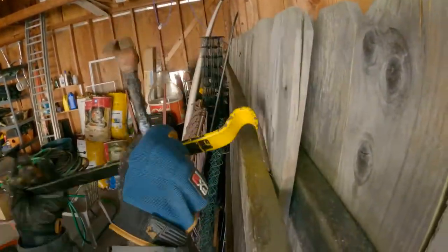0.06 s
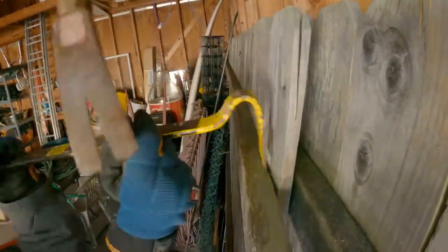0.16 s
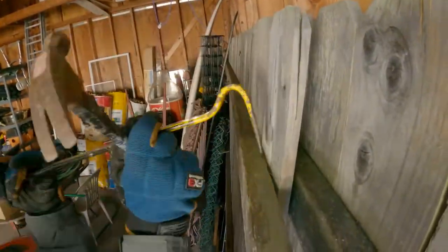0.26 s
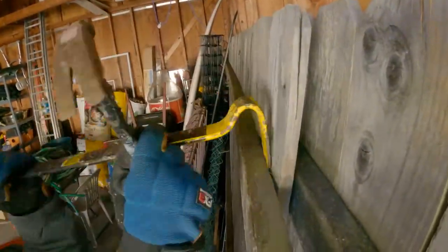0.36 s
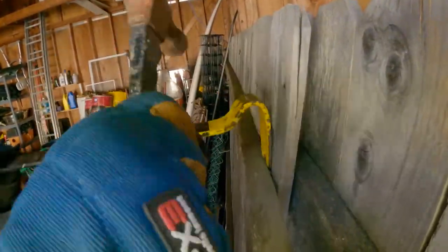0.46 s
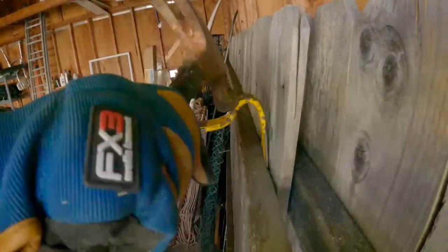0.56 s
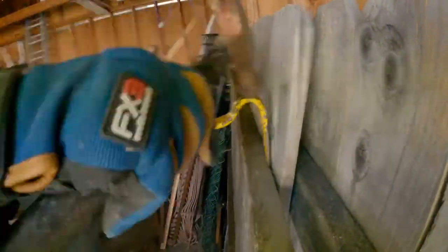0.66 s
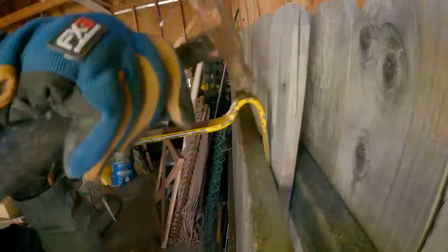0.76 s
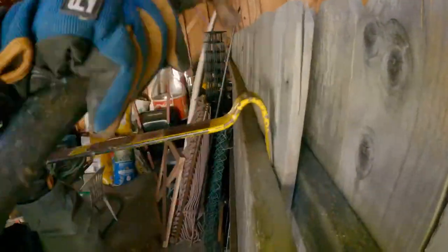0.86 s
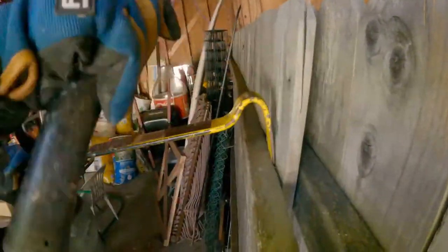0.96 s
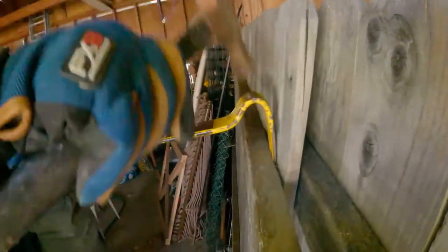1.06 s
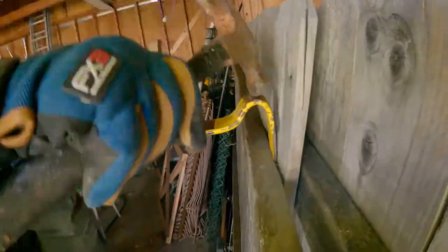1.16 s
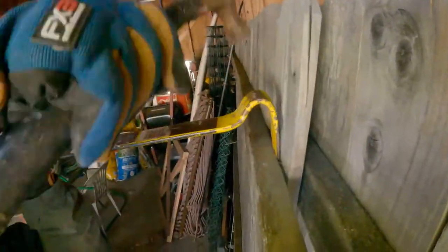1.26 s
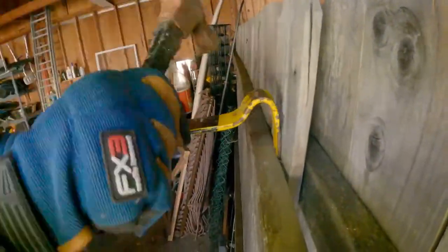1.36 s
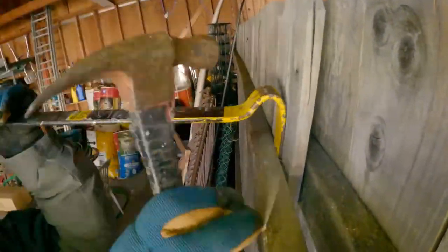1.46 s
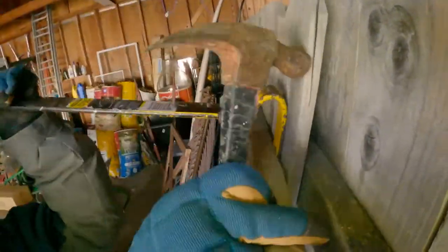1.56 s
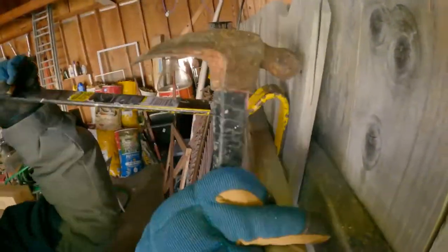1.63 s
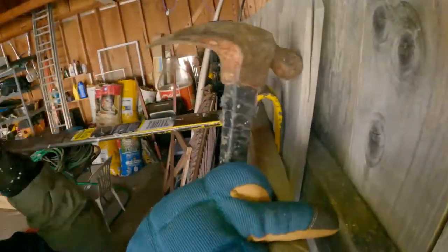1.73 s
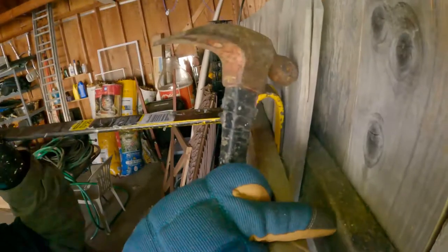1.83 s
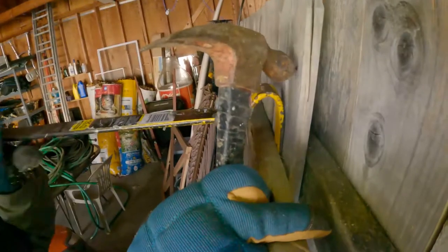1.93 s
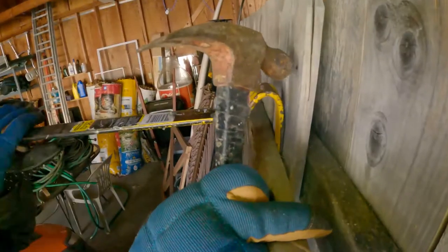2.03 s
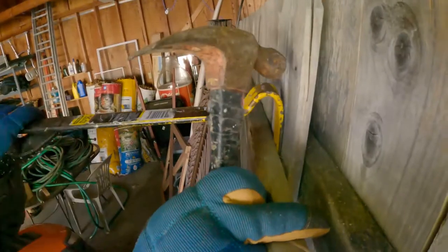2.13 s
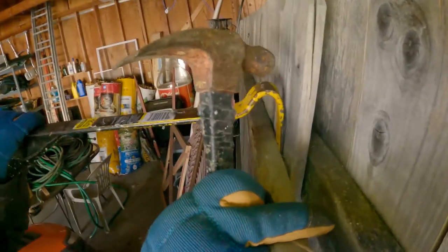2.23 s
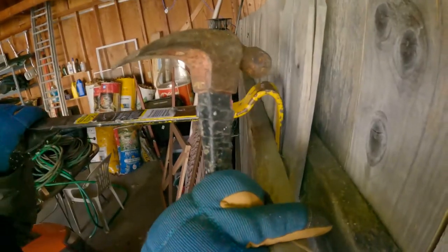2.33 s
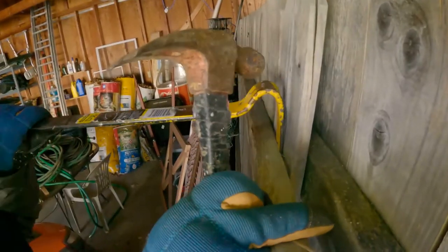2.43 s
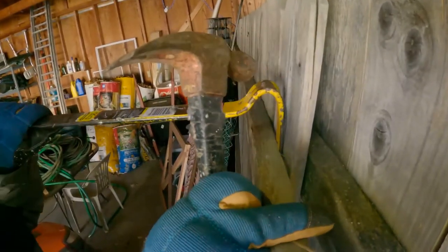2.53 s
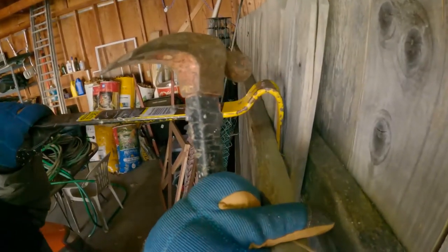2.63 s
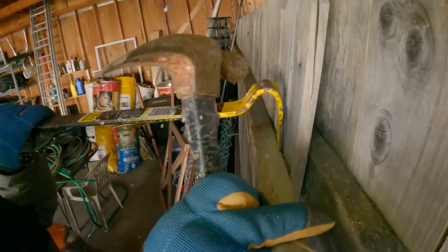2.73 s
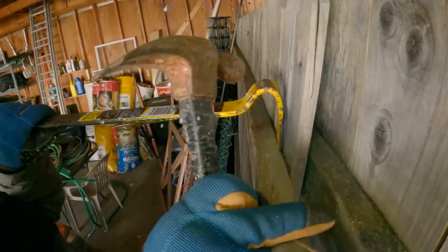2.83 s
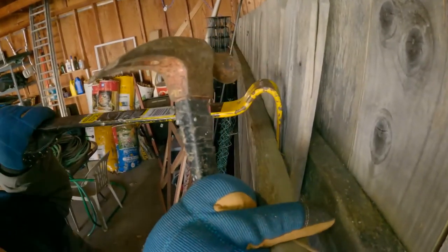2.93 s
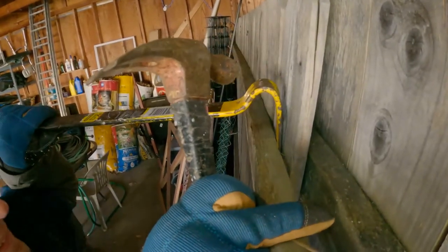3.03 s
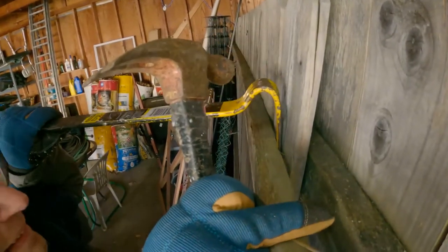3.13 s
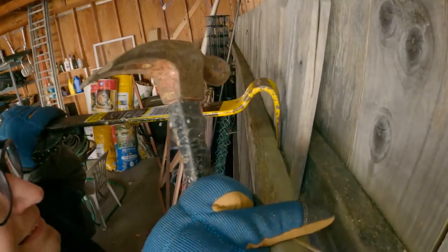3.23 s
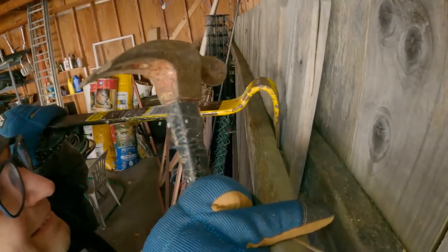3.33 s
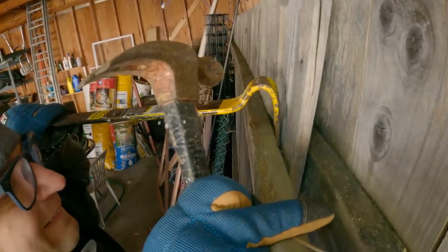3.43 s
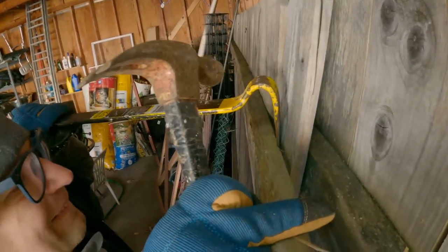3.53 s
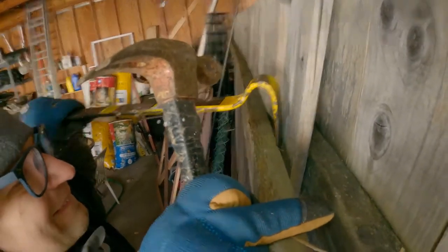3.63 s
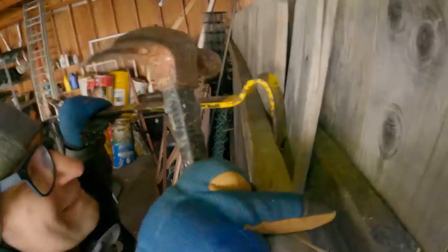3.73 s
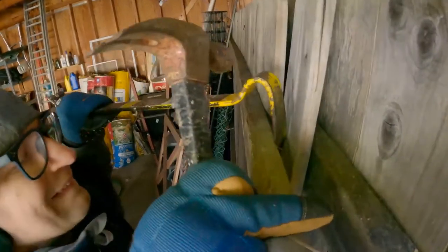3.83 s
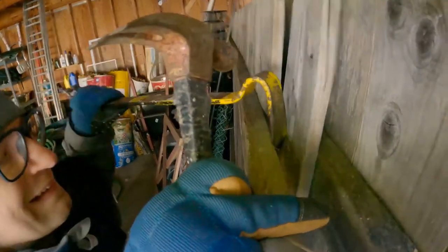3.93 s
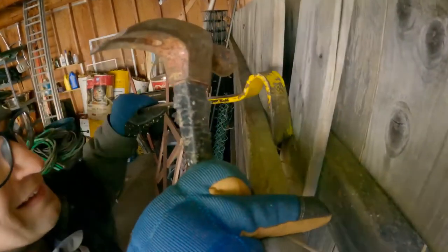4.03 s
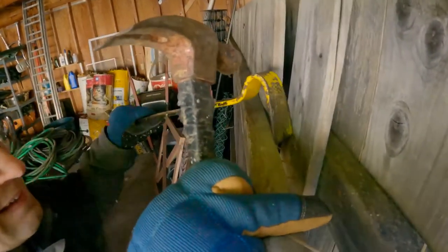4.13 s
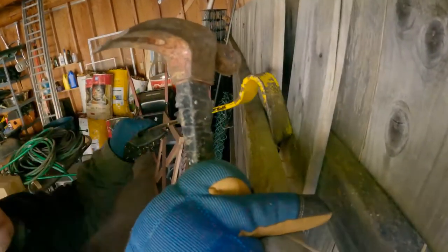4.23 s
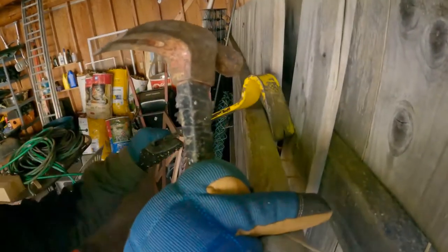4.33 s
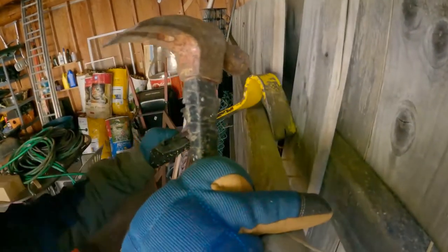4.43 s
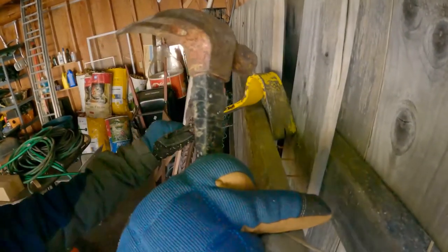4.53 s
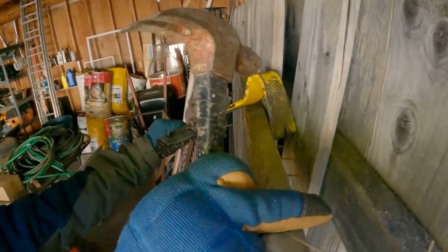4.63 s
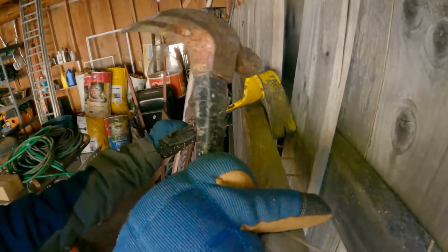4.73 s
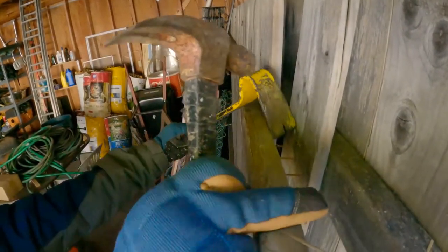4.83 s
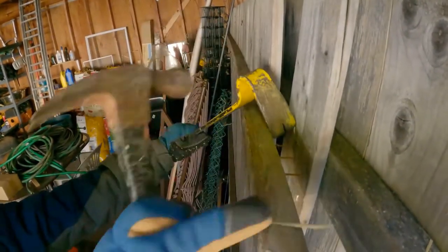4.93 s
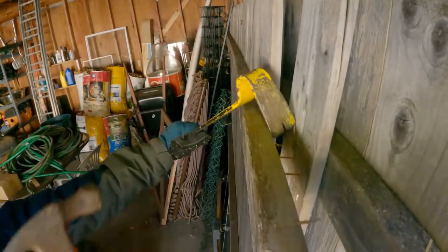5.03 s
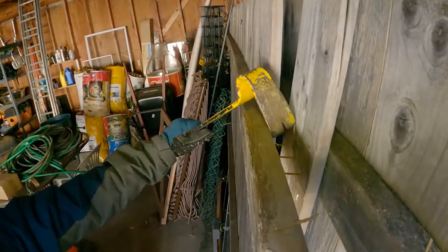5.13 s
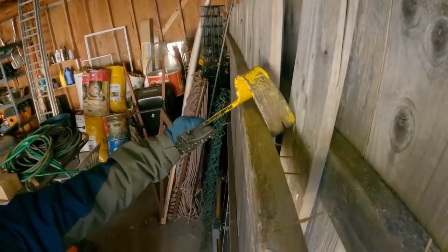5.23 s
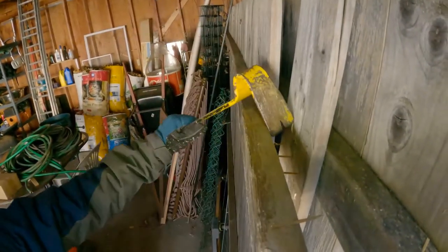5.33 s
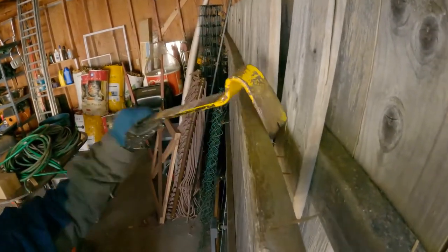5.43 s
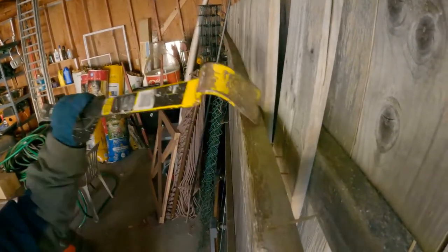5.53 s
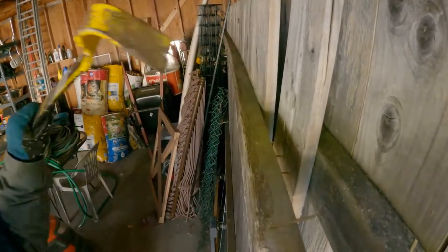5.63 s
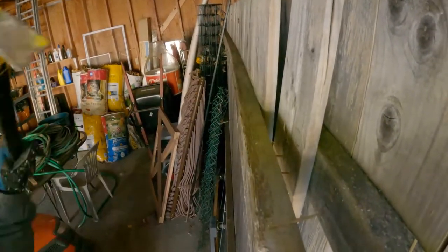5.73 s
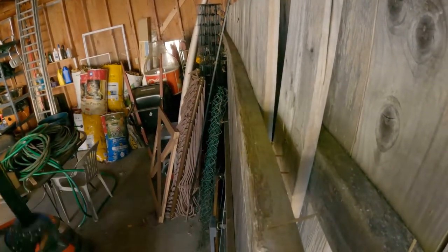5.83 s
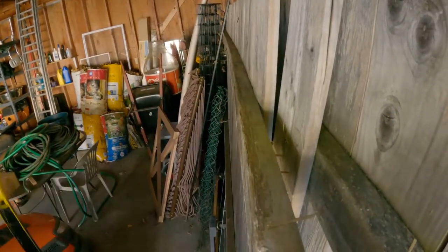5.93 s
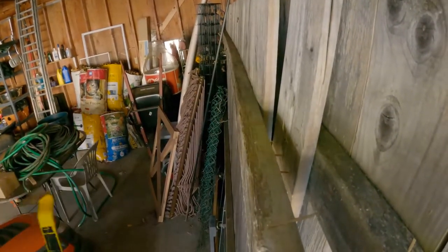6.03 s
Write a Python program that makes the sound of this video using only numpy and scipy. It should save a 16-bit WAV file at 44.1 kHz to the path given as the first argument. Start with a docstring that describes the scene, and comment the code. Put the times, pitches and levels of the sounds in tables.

```python
"""Fence boards prised apart in a shed

Old boards are taken apart close to the microphone, a little to its right, in a wooden shed. For the first
1.8 s time runs about three times as fast: a hammer drives a steel pry bar behind a board in quick taps,
each a burst that rings steel and wood. Then, at normal speed, the bar levers: fibres tick, the nails let go
in loud cracks (struck resonances), the panel shudders (decaying noise and a tone) and the bar is pulled out.
Sleeves swish as streams of tiny catches over an electrical hum of wavering sines and the air of the shed."""
import sys
import numpy as np
from scipy import signal
from scipy.fft import rfft, irfft, next_fast_len
from scipy.io import wavfile
from scipy.ndimage import uniform_filter1d, map_coordinates

SR = 44100
rng = np.random.default_rng(int(sys.argv[2]) if len(sys.argv) > 2 else 0)


def master(y):
    """Save y as 16-bit WAV."""
    cut = np.clip(np.atleast_2d(y).T, -1, 1)
    pcm = np.round(cut * 32767)  # scale
    wavfile.write(sys.argv[1], SR, pcm.astype(np.int16))


N = 268128

FAST_END, SPEED = 1.815, 3.07  # time runs SPEED times as fast until FAST_END [s]

# Levels in all the tables are relative: most layers add a trim of their own.
# single hammer blows: (time [s], steel tick [dB], wood knock [dB], steel clank [dB], knock pitch [ratio])
BLOWS = [(0.175, -35, -37.5, -47, 0.81), (0.212, -45, -39, -51, 0.73), (0.3368, -23, -27, -25.5, 1.03),
         (0.358, -74, -29.5, -59, 1.06), (.379, -36, -30, -30, 1.775), (.597, -36, -23.5, -27, 1.024),
         (0.617, -17.5, -52, -26, 0.59), (1.5869, -29.5, -28.5, -30, 0.894)]
# the bar slips in the gap, with a click and a short scrape:
# (time [s], scrape [dB], click [dB], scrape centre [Hz])
SLIPS = [(1.585, -37.5, -45, 1300), (2.83, -41.5, -47, 1500), (2.9047, -35, -47, 3300),
         (2.911, -43, -37, 1250), (3.209, -52, -43, 1400), (3.235, -49, -41.5, 2600),
         (3.261, -45, -45, 3000), (3.295, -47.5, -33.5, 1500), (3.325, -48.5, -35.5, 2400),
         (3.351, -49, -30, 2800), (3.424, -57, -44, 3100), (3.514, -41.5, -30, 1500),
         (3.552, -42.5, -43, 2800), (3.642, -36, -31, 2600), (3.651, -32.5, -39, 1250),
         (3.735, -35, -43, 1480), (4.9335, -51.5, -29.5, 2800), (5.041, -46, -35, 3000),
         (5.544, -41, -32, 1500), (5.5647, -36, -15.5, 1500)]
# the loosened board rocks and creaks on its nails: (time [s], level [dB])
CREAKS = [(4.208, -37), (4.276, -42.5), (4.297, -39), (4.318, -52), (4.341, -51), (4.362, -45),
          (4.389, -55), (4.407, -44), (4.431, -42), (4.54, -39.5), (4.556, -47), (4.585, -50), (4.621, -44),
          (4.655, -51.5), (4.724, -48.5), (4.741, -49), (4.771, -52), (4.789, -53), (4.868, -55.5),
          (4.938, -52), (4.958, -56), (4.988, -63), (5.626, -48), (5.75, -42.5), (5.824, -41.5),
          (5.838, -55)]


def amp(db):
    """Decibels to gain."""
    return 10 ** (np.asarray(db) / 20)


def unit(x):
    """Scale to rms 1."""
    return x / np.sqrt(np.mean(x ** 2) + 1e-20)


def along(points, hz):
    """Read (frequency [Hz], value) points on a log frequency axis."""
    f, v = np.transpose(points)
    return np.interp(np.log(hz + 1), np.log(f + 1), v)


def curve(rows):
    """(time [s], value) rows as one value per sample."""
    return np.interp(np.arange(N) / SR, *np.transpose(rows))


def wobble(rate):
    """A smooth random curve through rate knots a second."""
    knots = rng.standard_normal(int(N * rate / SR) + 4)
    return map_coordinates(knots, [np.arange(N) * rate / SR])


def filtered(x, response):
    """x times a complex response of frequency."""
    n = x.shape[-1]
    m = 2 * next_fast_len(n // 2 + SR // 16)
    return irfft(rfft(x, m) * response(np.fft.rfftfreq(m, 1 / SR)), m)[..., :n]


def colour(spectrum):
    """Causal (minimum-phase) response with the given (frequency [Hz], level [dB]) outline."""
    def response(hz):
        cepstrum = irfft(np.log(amp(along(spectrum, hz))))
        # folding the cepstrum onto positive times makes the response causal
        return np.exp(rfft(cepstrum * (1 + np.sign(np.fft.fftfreq(len(cepstrum))))))
    return response


def modes(rows):
    """Causal response of damped resonances with alternating sign: (centre [Hz], width [Hz], level [dB])."""
    def response(f):
        total = 0
        for k, (centre, width, db) in enumerate(rows):
            damping = 1j * f * width
            total = total + (-1) ** k * amp(db) * damping / (centre * centre - f * f + damping)
        return total
    return response


def varied(rows, pitch=1):
    """A body's resonances as one contact meets them: each a little stronger or weaker, higher or lower."""
    detune, scatter_db = .012, 1.5
    chance = np.clip(rng.standard_normal((len(rows), 2)), -2, 2)
    return modes([(hz * pitch * (1 + detune * a), width, db + scatter_db * b)
                  for (hz, width, db), (a, b) in zip(rows, chance)])


def add(track, s, x):
    """Mix x into the track from time s."""
    start = max(round(s * SR), 0)
    track[start:start + len(x)] += x[:max(N - start, 0)]


def contact(body, t60, rough, size=6000):
    """A sharp push with a brief rough tail rings a body; it carries the energy of 5 ms at rms 1."""
    t = np.arange(size) / SR
    tail = rng.standard_normal(size) * amp(-60 * t / t60)
    push = rough * tail / np.linalg.norm(tail) + (t == 0)
    x = filtered(push, body)
    return x / np.linalg.norm(x) * np.sqrt(SR / 200)


def grains(rate, spread_db, size):
    """Tiny impacts of uneven size and random sign, rate a second."""
    hit = rng.random(size) < rate / SR
    sign = np.sign(rng.standard_normal(size))
    return unit(hit * sign * amp(spread_db * np.clip(rng.standard_normal(size), -2, 2)))


def wide(pair, side_db):
    """Two unrelated signals as mid and side."""
    return pair[0] + amp(side_db) * np.array([pair[1], -pair[1]])


def swells(rows, rest_db):
    """Gain of movements that grow and fade exponentially over a resting level."""
    t = np.arange(N) / SR
    power = amp(2 * rest_db)
    for s, db, rise, fall in rows:
        power = power + amp(2 * db) * np.exp(-2 * np.maximum((s - t) / rise, (t - s) / fall))
    return np.sqrt(power)


def shed(x, speed=1, count=20):
    """The shed's diffuse answer, new for each of count stretches; faster time shortens its decay."""
    # (frequency [Hz], decay by 60 dB at normal speed [s])
    decay = [(100, 0.94), (500, 0.53), (2000, 0.62), (5000, 0.32), (12000, 0.32)]
    out = np.zeros((2, N + 2 * SR))
    for part in np.array_split(np.arange(N), count):
        if np.abs(x[part]).max() > 0:
            hz, t, z = signal.stft(rng.standard_normal((2, SR * 3 // 4)), SR, nperseg=256)
            swell = 1 - np.exp(-t * speed / 0.0015)
            fade = amp(-60 * t * speed / along(decay, hz / speed)[:, None])
            tail = signal.istft(z * swell * fade, SR, nperseg=256)[1]
            answer = wide(tail / np.linalg.norm(tail[0]), side_db=-22.0)
            wet = signal.fftconvolve(x[part][None], answer, axes=1)
            out[:, part[0]:part[0] + wet.shape[1]] += wet
    return out[:, :N]


def near_boards(x, size=700):
    """Close reflections off the fence differ between the two ports, above the bass."""
    t = np.arange(size) / SR
    echoes = rng.standard_normal(size) * amp(-60 * t / .04) * (t > .002)
    side = signal.fftconvolve(x.mean(axis=0), echoes / np.linalg.norm(echoes))[:N]
    side = filtered(side, lambda hz: hz / (hz + 400))
    return x + amp(-10) * np.array([side, -side])


def background():
    """Wavering sines hum under shaped-noise air; while time runs fast the hum is higher and the air differs."""
    # electrical hum at normal speed: (frequency [Hz], level [dB])
    hum_lines = [(64.6, -58), (156.1, -46), (225, -63)]
    # spectra of the air at normal speed and while time runs fast: (frequency [Hz], level [dB])
    air_shape = [(12, -62), (20, -1), (49, -5), (107, 2), (158, 2.5), (204, -2.5), (310, -12), (499, -18.5),
                 (759, -21.5), (1120, -28), (1440, -53), (4420, -53), (6360, -45), (9140, -46.5),
                 (16000, -61)]
    fast_air_shape = [(15, -44), (25, -26), (85, 1), (150, 1), (249, -6), (489, -7), (911, -17),
                      (1130, -24.5), (1330, -26.5), (1940, -26), (2220, -19.5), (3430, -33.5), (5730, -41),
                      (16000, -61)]
    # the background sinks after the taps and cracks and creeps back: (time [s], level [dB])
    lull = [(1.4, 11), (1.52, 4.5), (1.85, 3), (3.7, 4.5), (4.2, -1), (4.7, 2), (5.3, 2), (5.8, 3.5)]
    fast_hum_db, air_db, fast_air_db = -15.5, -49, -57
    fast = uniform_filter1d((np.arange(N) / SR < FAST_END) * 1., size=400)
    clock = np.cumsum(1 + (SPEED - 1) * fast) / SR
    hum = np.zeros(N)
    for hz, db in hum_lines:
        level = amp(db + 1.8 * wobble(9))
        hum += level * np.sin(2 * np.pi * hz * clock + .6 * wobble(9))
    air, fast_air = (unit(wide(filtered(rng.standard_normal((2, N)), colour(shape)), side_db=-16.0))
                     for shape in (air_shape, fast_air_shape))
    hum = np.sqrt(2) * hum * amp(fast_hum_db * fast)
    still = amp(air_db) * (1 - fast) * air + amp(fast_air_db) * fast * fast_air
    return amp(curve(lull)) * (hum + still)


def friction(spectrum, rate):
    """Sliding contact: a stream of tiny catches."""
    pair = np.array([grains(rate, spread_db=3, size=N) for port in range(2)])
    return unit(wide(filtered(pair, colour(spectrum)), side_db=-9.5))


def handling():
    """Catches in cloth swish, the bar sticks and slips along the wood, low noise rumbles in the worn microphone."""
    # movements: (peak time [s], level [dB], rise time constant [s], fall time constant [s])
    swishes = [(0.05, -52, 0.19, 0.14), (.56, -46.5, 0.045, 0.024), (1.38, -43, 0.41, 0.066),
               (1.83, -44, 0.033, 0.0076), (2.22, -55, 0.64, 0.059), (2.5, -52.5, 0.057, 0.11),
               (3.68, -50.5, 0.52, 0.17), (5.24, -46.5, 0.12, 0.35), (6.05, -36.5, 0.056, 0.027)]  # arm movements swish the sleeves
    strokes = [(1.87, -54.5, 0.08, 0.16), (3.55, -58.5, 0.16, 0.085), (3.82, -32.5, 0.075, 0.2),
               (4.92, -52, 0.11, 0.052), (5.55, -48.5, 0.49, 0.1), (6.04, -56, 1, 0.039)]  # strokes of the bar along the wood
    jolts = [(.37, -17, .25, 0.065), (1.95, -41, 0.066, 0.21), (2.86, -30.5, 0.031, 0.041),
             (3.79, -26.5, .04, 0.46), (5.64, -25, 0.03, 0.17)]  # jolts of the body rumble in the microphone
    # spectra of sleeve cloth, bar on wood and rumble: (frequency [Hz], level [dB])
    cloth_shape = [(300, -49.5), (900, -8), (1400, 5.5), (2000, 5), (3000, 0), (6000, 2), (9500, 0.5),
                   (11000, -7.5), (16000, -17)]
    rub_shape = [(200, -22.5), (420, 4.5), (520, -13.5), (680, 1.5), (1000, 0.5), (1230, -4.5),
                 (1400, -1.5), (1720, -5), (2400, -8.5), (4000, -11.5), (12000, -39)]
    rumble_shape = [(12, -17), (28, 15.5), (60, 13), (110, 2.5), (300, -51.5)]
    # resonances of the rubbed board: (centre [Hz], width [Hz], level [dB])
    groan_modes = [(590, 220, 2.5), (1216, 28, 4), (1400, 170, -14.5), (1750, 110, -9.5), (1700, 130, -12)]
    late = np.arange(N) / SR > FAST_END

    cloth = amp(0.43) * friction(cloth_shape, rate=8200)
    fast_cloth = amp(-3.5) * friction([(hz * SPEED, db) for hz, db in cloth_shape], rate=9500)
    sleeves = swells(swishes, rest_db=-66) * np.where(late, cloth, fast_cloth)

    # the bar sticks and slips unevenly, and each slip rings the board
    slips = unit(amp(3.5 * wobble(45)))
    groan = unit(filtered(slips * grains(rate=600, spread_db=2, size=N), modes(groan_modes)))
    rub = slips * friction(rub_shape, rate=2400)
    drag = swells(strokes, rest_db=-71.5) * unit(groan + amp(5.5) * rub)

    low, fast_low = (
        unit(wide(filtered(rng.standard_normal((2, N)),
                           colour([(hz * speed, db) for hz, db in rumble_shape])), side_db=-14.0))
        for speed in (1, SPEED))
    rumble = swells(jolts, rest_db=-46) * np.where(late, amp(-2.0) * low, amp(-17) * fast_low)
    return sleeves + late * drag + rumble


def scuffing():
    """Bar, board or glove skids a little: a quick swell of tiny catches through a resonance."""
    # the glove shifts its grip: (time [s], level [dB], centre [Hz], time to peak [s])
    grips = [(.548, -43, 3420, 0.0099), (1.94, -53, 2240, 0.033), (2.151, -53.5, 3600, 0.057),
             (2.343, -46, 1800, 0.037), (2.591, -52, 460, 0.019), (5.191, -50, 9800, 0.061)]
    # resonances of the creaking board: (centre [Hz], width [Hz], level [dB])
    creak_modes = [(650, 96, 2.5), (1230, 56, 7.5), (1480, 250, -3.5), (1714, 220, 3), (2600, 870, -15)]
    slip_width, grip_width = 0.56, 0.77  # bandwidth over centre frequency
    slip_rise, creak_rise = 0.007, 0.0077  # time to peak [s]
    out, t = np.zeros(N), np.arange(SR // 2) / SR
    # each single blow skids the bar under its clank
    skids = [(s, clank_db - 16, 1400) for s, tick_db, knock_db, clank_db, pitch in BLOWS]
    skids += [(s, db, hz) for s, db, click_db, hz in SLIPS]
    scuffs = [(s, db, [(hz, hz * slip_width, 0)], slip_rise) for s, db, hz in skids]
    scuffs += [(s, db, creak_modes, creak_rise) for s, db in CREAKS]
    scuffs += [(s, db, [(hz, hz * grip_width, 0)], rise) for s, db, hz, rise in grips]
    for s, db, body, rise in scuffs:
        catches = grains(rate=1500, spread_db=4, size=len(t))
        pressure = (t / rise * np.exp(1 - t / rise)) ** 2
        skid = filtered(pressure * catches, varied(body))
        add(out, s, amp(db) * skid * np.linalg.norm(pressure) / np.linalg.norm(skid))
    return out + amp(-7.5) * shed(out)


def thuds():
    """A bump swings the low modes of the fence; the softer it is, the fewer it reaches."""
    # soft bumps against the fence: (time [s], level [dB], softness cut-off [Hz])
    bumps = [(0.224, -2, 50), (2.006, -22, 168), (3.689, -19, 246), (3.749, -42, 500), (3.789, -24, 253),
             (4.041, -5, 198), (4.239, -5.5, 81.9), (4.389, -9, 69), (5.011, -21.5, 100), (5.605, 1.5, 58),
             (5.612, -22.5, 500), (5.636, -23, 700), (5.755, -18, 80), (5.825, -17.5, 72.5)]
    # low modes of the fence at normal speed: (frequency [Hz], level [dB], decay by 60 dB [s])
    fence = [(63.3, -4.5, 0.17), (89.4, -11, 0.099), (107, -0.5, 0.083), (164.4, -12.5, 0.16),
             (246, -5.5, 0.052), (416.3, -8.5, 0.16)]
    # resonances of the knock as the bar seats itself: (centre [Hz], width [Hz], level [dB])
    seat_modes = [(96.5, 91, 6.5), (335, 490, -2.5), (700, 130, -4)]
    rise_cycles = 1  # each mode builds up over about this many of its cycles
    out = np.zeros(N)
    for s, db, soft_hz in bumps:
        t = np.arange(SR // 2) / SR * (SPEED if s < FAST_END else 1)
        for hz, mode_db, t60 in fence:
            rise = 1 - np.exp(-(t * hz / rise_cycles) ** 2)
            level = amp(db + mode_db - 60 * t / t60) / (1 + (hz / soft_hz) ** 4)
            add(out, s, level * rise * np.sin(2 * np.pi * hz * t))
    # the bar seats itself with one dead knock
    add(out, 2.8335, amp(-22.5) * contact(modes(seat_modes), t60=.01, rough=.1))
    return out + amp(-10) * shed(out)


def squeaking():
    """Stick and slip locks into a wavering tone that swells, glides and stops."""
    # nails squeak and the bent board groans:
    # (time [s], length [s], level [dB], start [Hz], end [Hz], pitch unsteadiness [share])
    squeaks = [(1.865, .06, -47, 1230, 1190, .014), (1.878, .06, -25, 150, 85, .014),
               (3.652, .06, -26, 160, 100, .014), (4.85, .18, -55, 1700, 1640, .04),
               (4.92, .08, -53, 1225, 1270, .035), (5.47, .13, -43, 1360, 1450, .036)]
    flutter_db = 4
    out = np.zeros(N)
    for s, length, db, start_hz, end_hz, unsteady in squeaks:
        u = np.linspace(0, 1, int(length * SR))
        waver, flutter = wobble(300)[:len(u)], wobble(220)[:len(u)]
        hz = (start_hz + (end_hz - start_hz) * u) * (1 + unsteady * waver)
        swell = amp(db + flutter_db * flutter) * np.sin(np.pi * u)
        add(out, s, swell * np.sin(2 * np.pi * np.cumsum(hz) / SR))
    return out + amp(-12) * shed(out)


def shudder():
    """The freed panel booms, noise and one main mode, until friction stops it; loose boards rattle and clap."""
    # the panel springs free and shudders: (time [s], boom [dB], rattle [dB], boom decay by 60 dB [s],
    # rattle decay by 60 dB [s], main mode [dB], main mode at normal speed [Hz])
    shudders = [(1.587, -28.5, -34, 0.19, 0.11, -35.5, 92.2), (3.748, -18, -33, 0.72, 1, -21, 167.7),
                (4.034, -22.5, -25.5, 0.63, 0.37, -24.5, 108.3),
                (5.575, -29.5, -27.5, 0.48, 0.082, -49, 52)]
    # spectra at normal speed: (frequency [Hz], level [dB])
    boom_shape = [(15, -31.5), (28, -4), (45, -3.5), (100, -0.5), (165, 0), (240, -5), (340, -13.5),
                  (480, -13.5), (900, -39), (3000, -109)]
    rattle_shape = [(150, -10.5), (330, 2), (450, -9), (520, -4.5), (620, 4.5), (1000, 9), (1300, -41),
                    (1650, -31), (2200, -4.5), (3500, -15), (7000, -21), (10000, -28), (16000, -46)]
    # resonances of the loose boards, and of a clap: (centre [Hz], width [Hz], level [dB])
    panel_modes = [(324, 13, 13), (426, 17, 0), (612, 24, 7), (850, 32, -4), (997, 16, 3), (1248, 32, 6.5),
                   (1320, 25, -8), (1620, 35, 0.5), (1770, 90, -6), (1960, 18, 2)]
    clap_modes = [(276, 72, 3), (425, 80, -2.5), (606, 23, -4), (1160, 82, -11), (1720, 170, -10.5)]
    # loose boards clap against the rail: (time [s], level [dB], pitch [ratio])
    claps = [(3.747, -17.5, 0.9), (3.762, -27, 1.03), (3.786, -22, 0.96), (3.811, -25, 1.03),
             (3.833, -27, 0.94), (3.864, -42, 1.05), (3.892, -29, 1.05), (3.935, -30.5, 1.2),
             (4.036, -18, 0.91), (4.061, -26.5, 0.82), (4.088, -28, 0.93), (4.126, -27.5, 1.104),
             (4.162, -45, 1.32), (4.21, -39, 1.24)]
    ring_waver = .035  # share of the main mode's pitch
    boom, rattle, t = np.zeros(N), np.zeros(N), np.arange(SR) / SR
    for s, boom_db, rattle_db, boom_t60, rattle_t60, ring_db, ring_hz in shudders:
        speed = SPEED if s < FAST_END else 1
        sway = unit(filtered(rng.standard_normal(SR), lambda f: colour(boom_shape)(f / speed)))
        hz = ring_hz * speed * (1 + ring_waver * wobble(40)[:SR])
        ring = unit(np.sin(2 * np.pi * np.cumsum(hz) / SR))
        envelope = amp(-60 * (t / boom_t60) ** 1.6) * (1 - np.exp(-t / .01))
        add(boom, s, envelope * (amp(boom_db) * sway + amp(ring_db) * ring))
        knocks = grains(rate=200 * speed, spread_db=5, size=SR)
        dull, ringing = (unit(filtered(knocks, lambda f: body(f / speed)))
                         for body in (colour(rattle_shape), modes(panel_modes)))
        add(rattle, s, amp(rattle_db - 60 * t / rattle_t60) * unit(dull + amp(2) * ringing))
    for s, db, pitch in claps:
        add(rattle, s, amp(db) * contact(varied(clap_modes, pitch), t60=0.014, rough=.5))
    return boom + rattle + amp(-14.5) * shed(boom) + amp(-5.5) * shed(rattle)


def strain(count=24):
    """Faint fibre ticks at uneven times, tending louder as the load grows: (time [s], level [dB])."""
    start, end = 3.2, 3.68  # [s]
    first_db, db_per_s, scatter_db = -37, 14, -4
    times = start + (end - start) * (np.arange(count) + rng.random(count)) / count
    return [(s, first_db + db_per_s * (s - start) + scatter_db * rng.standard_normal()) for s in times]


def cracking():
    """Fibres snap, nails jerk and the bar slips: each is a struck snap and splinter hiss that rings the board."""
    # wood fibres snap under the bar: (time [s], level [dB])
    fibres = [(2.5396, -21.5), (2.86, -37), (2.908, -19.5), (3.0077, -28), (3.037, -27), (3.1044, -30.5),
              (3.261, -22), (3.4243, -13.5), (3.43, -18), (3.502, -40), (3.5166, -18), (3.552, -23),
              (3.644, -23), (3.687, -3.5), (3.6931, -6)]
    # the nails let go in jerks: (time [s], snap [dB], board [dB])
    nails = [(3.746, 0.5, -7), (3.7659, -9.5, -29), (3.778, -15.5, -19), (3.806, -14.5, -22),
             (3.9753, -17.5, -19), (4.033, -13, -13.5), (4.0433, -6.5, -14), (4.0487, -10, -16.5),
             (4.058, -13.5, -30)]
    # resonances of snap and board: (centre [Hz], width [Hz], level [dB])
    snap_modes = [(2600, 170, -4.5), (3060, 69, 6), (3360, 690, -5.5), (4790, 560, -4), (5926, 360, 2.5),
                  (6920, 990, 0.5), (8330, 1300, -7), (10500, 700, -13)]
    board_modes = [(910, 710, -14.5), (1373, 122, 7), (1640, 140, -3.5), (1914, 76, -5.5)]
    # spectrum of the splinter hiss: (frequency [Hz], level [dB])
    splinter_shape = [(4000, -55), (8000, 3.5), (10000, -3), (13000, -8), (16000, -11.5)]
    snaps, board = np.zeros((2, N))
    # (time, snap, board, splinter), board and splinter mostly set relative to the snap
    cracks = [(s, db, db - 20, db - 14) for s, db in fibres + strain()]
    cracks += [(s, db, board_db, db - 20.5) for s, db, board_db in nails]
    clicks = [(s, db) for s, scrape_db, db, hz in SLIPS]
    clicks += [(s, db - 3.5) for s, db in CREAKS]
    cracks += [(s, db, db - 18, db - 14) for s, db in clicks]
    for s, snap_db, board_db, splinter_db in cracks:
        snap = contact(varied(snap_modes), t60=.016, rough=1)
        ring = contact(varied(board_modes), t60=.014, rough=.6)
        splinter = contact(colour(splinter_shape), t60=0.013, rough=4.3)
        add(snaps, s, amp(snap_db - 15.0) * snap)
        add(snaps, s, amp(splinter_db - 4.5) * splinter)
        add(board, s, amp(board_db - 8.0) * ring)
    return snaps + board + amp(-17.5) * shed(snaps) + amp(-10.5) * shed(board)


def knock(pitch):
    """A clean blow, cushioned by the wood, rings the wedged board much the same way each time."""
    # resonances of the wedged board: (centre [Hz], width [Hz], level [dB])
    knock_modes = [(120, 90, -9), (215, 80, -9), (390, 56, 7), (460, 50, -5), (625, 130, -2.5),
                   (835, 100, -6), (1110, 150, -15), (1350, 200, -12)]
    soft_hz = 850
    board = modes([(hz * pitch, width, db) for hz, width, db in knock_modes])
    return contact(lambda f: board(f) / (1 + 1j * f / soft_hz) ** 2, t60=.013, rough=.25)


def hammering():
    """Each blow ticks on steel, clanks in the bar and knocks the board; the bar then buzzes in the gap."""
    # a quick run of taps as the bar wedges tight:
    # (time [s], steel tick [dB], wood knock [dB], steel clank [dB], knock pitch [ratio])
    taps = [(0.7234, -16, -28, -29, 0.986), (0.807, -16.5, -30, -32, 1.19), (0.8876, -16, -28, -30, 0.98),
            (0.9681, -14, -28, -27, 1.05), (1.0505, -16.5, -31, -32, 0.97),
            (1.1314, -14.5, -31, -29.5, 1.06), (1.211, -15.5, -30.5, -32, 0.962),
            (1.294, -14, -30, -33, 0.99), (1.3759, -14.5, -32.5, -29, 1.15)]
    # the board slaps back alike after each tap: (delay [s], level relative to the knock [dB])
    rebounds = [(0.0099, -5.5), (0.0257, 1.5), (0.041, -4.5)]
    # light touches of the tools: (time [s], level [dB], centre [Hz])
    touches = [(0.077, -23.5, 8100), (0.233, -35, 3500), (0.276, -40, 5360), (0.4784, -26, 9700),
               (0.495, -34, 1870), (1.6473, -25.5, 3240), (1.729, -29, 5660), (1.823, -42, 8760)]
    # spectra of the steel tick and the low thump under the knock: (frequency [Hz], level [dB])
    tick_shape = [(2000, -54), (5000, -17), (7000, 8.5), (11000, 3.5), (14000, 8), (17000, 5)]
    thump_shape = [(30, -49), (80, -7), (140, -8.5), (220, -4.5), (350, -3.5), (900, -50)]
    # resonances of the steel bar: (centre [Hz], width [Hz], level [dB])
    bar_modes = [(2386, 190, 0.93), (2870, 110, 2), (3980, 2200, 2), (5220, 2000, 1.3)]
    # resonances of the bar buzzing in the gap, same columns
    buzz_modes = [(1130, 400, 5.5), (2600, 260, -0.5), (4700, 760, -1.0), (7350, 670, 2.5), (9600, 7800, -5.5)]
    blow_thump_db, tap_thump_db = -1.5, -3  # relative to the knock
    knock_gain_db = 6.5
    ticks, clanks, wood, buzz = np.zeros((4, N))
    t = np.arange(SR // 4) / SR
    strikes = [(*row, blow_thump_db) for row in BLOWS] + [(*row, tap_thump_db) for row in taps]
    for s, tick_db, knock_db, clank_db, pitch, thump_db in strikes:
        add(ticks, s, amp(tick_db - 11.0) * contact(colour(tick_shape), t60=0.014, rough=4.3))
        add(clanks, s, amp(clank_db - 1.5) * contact(modes(bar_modes), t60=0.022, rough=4.9))
        add(wood, s, amp(knock_db + knock_gain_db) * knock(pitch))
        add(wood, s, amp(knock_db + thump_db) * contact(colour(thump_shape), t60=0.069, rough=4.5))
        chatter = unit(filtered(rng.standard_normal(len(t)), modes(buzz_modes)))
        add(buzz, s, amp(tick_db - 25.0) * np.exp(-(t / 0.068) ** 4) * chatter)
    for s, tick_db, knock_db, clank_db, pitch in taps:
        for delay, db in rebounds:
            add(wood, s + delay, amp(knock_db + db) * knock(pitch))
    for s, db, hz in touches:
        add(clanks, s, amp(db - 13.5) * contact(modes([(hz, hz * 0.99, 0)]), t60=0.024, rough=1.8))
    room = amp(-24.0) * shed(ticks, SPEED) + amp(-10.0) * shed(clanks, SPEED)
    room += amp(-6.5) * shed(wood, SPEED, count=1)
    return ticks + clanks + wood + buzz + room


def scene():
    """The fence stands a little to the right, by a level difference that varies with frequency."""
    # (frequency [Hz], left minus right [dB])
    lean = [(60, -5.5), (200, -2.5), (800, -4), (2000, -1), (4000, -1), (8000, -1.5), (12000, 0)]
    work = near_boards(hammering() + cracking() + scuffing() + squeaking() + shudder() + thuds())
    work = filtered(work, lambda hz: amp(along(lean, hz) * np.array([[.5], [-.5]])))
    return work + (handling() + background()) * amp([[-.7], [.7]])


def record(dry):
    """Sound reaches the left port a fraction of a sample later; peaks round off and the band is limited."""
    top_hz = 16100
    delay = np.array([[.4], [0]])  # left, right [samples]
    ports = filtered(dry, lambda hz: np.exp(-2j * np.pi * hz * delay / SR))
    rounded = ports / (1 + np.abs(ports / 1.1) ** 6) ** (1 / 6)
    return filtered(rounded, lambda hz: 1 / (1 + (hz / top_hz) ** 90))


dry = scene()
out = record(dry)
master(out)
```